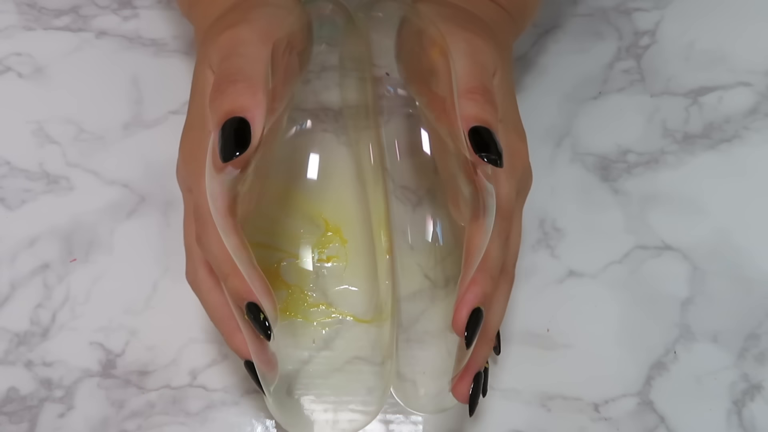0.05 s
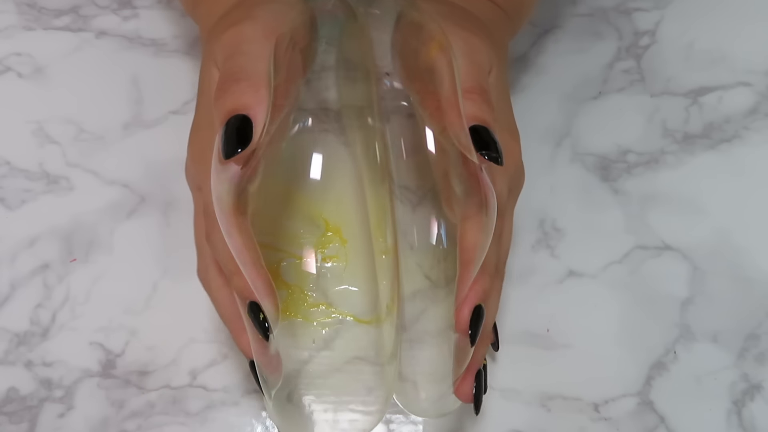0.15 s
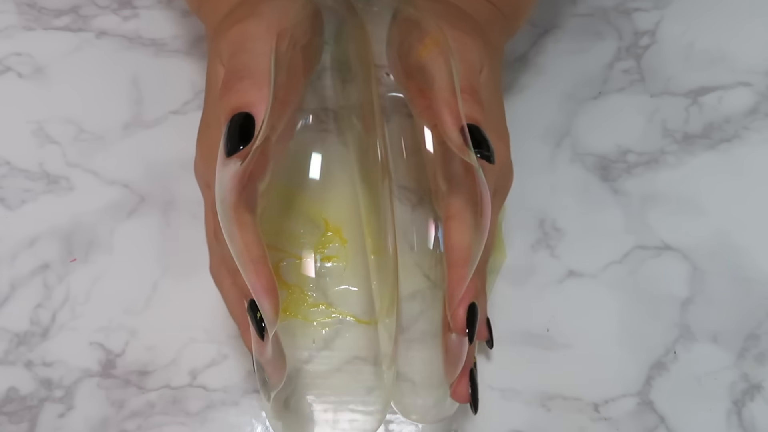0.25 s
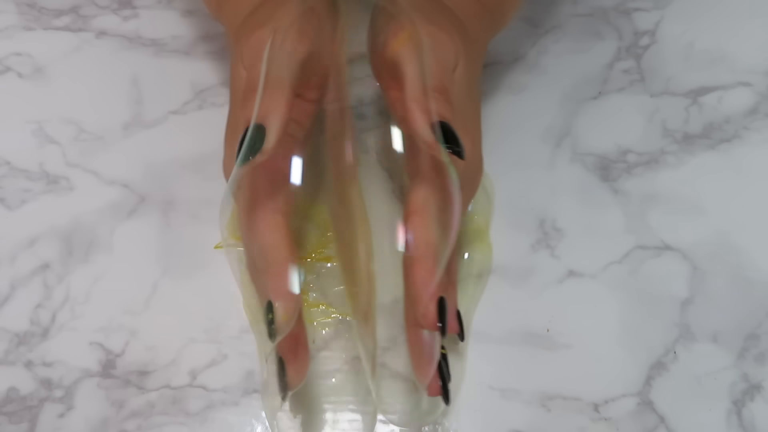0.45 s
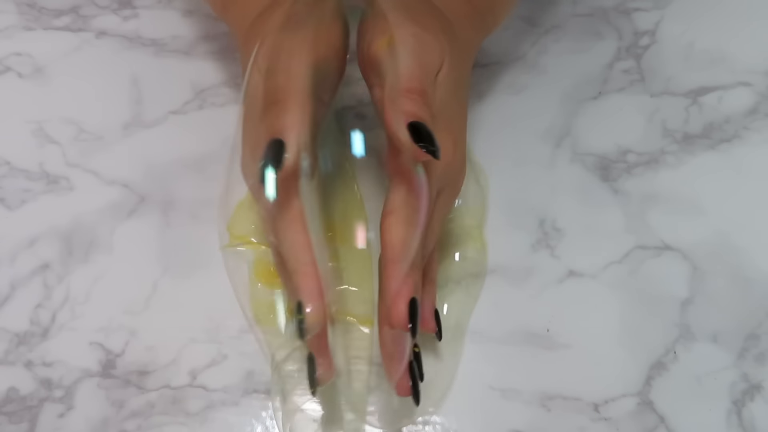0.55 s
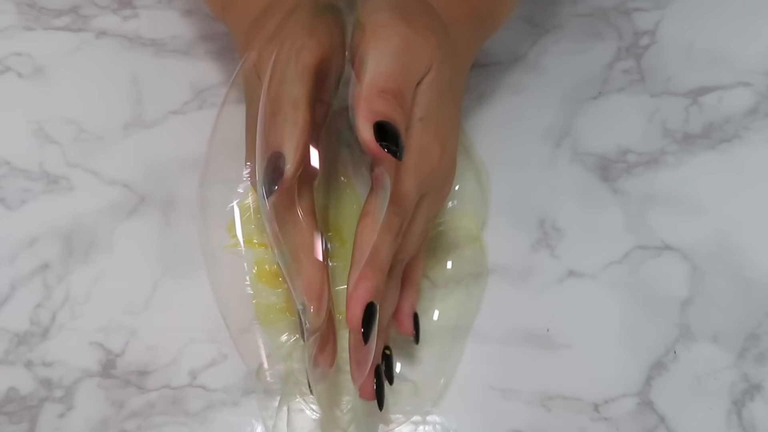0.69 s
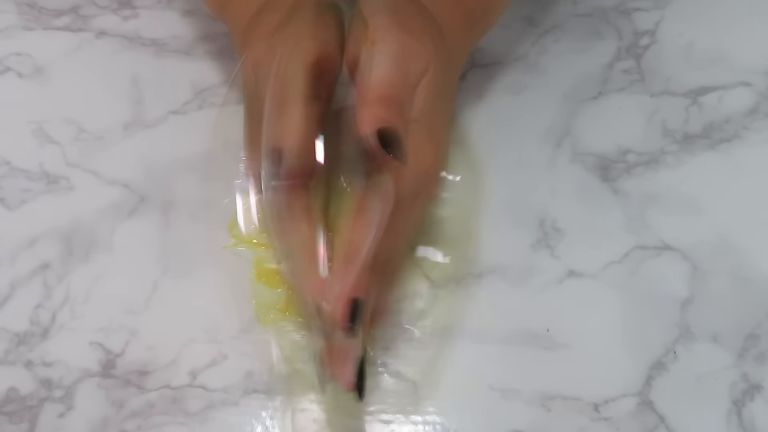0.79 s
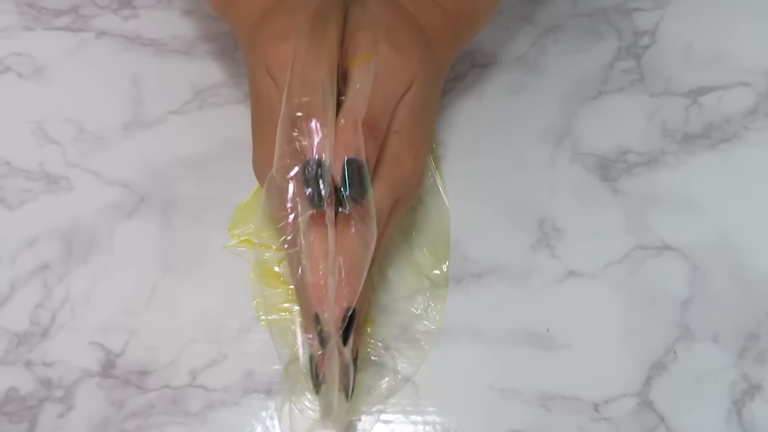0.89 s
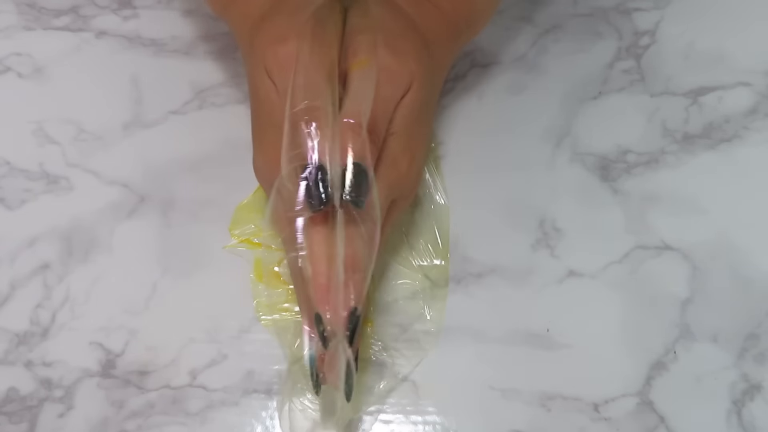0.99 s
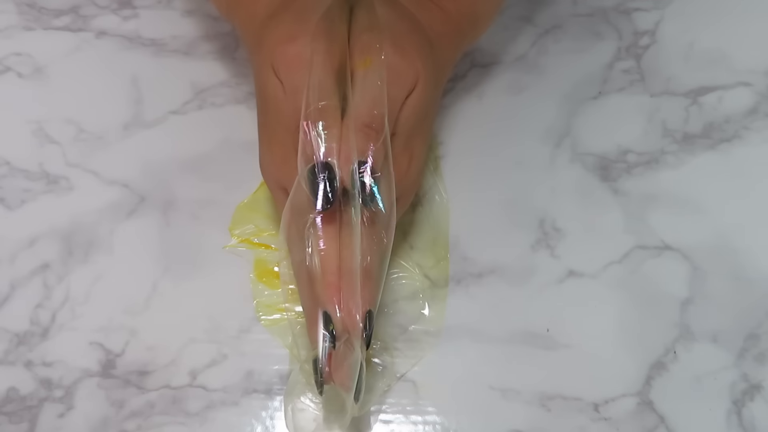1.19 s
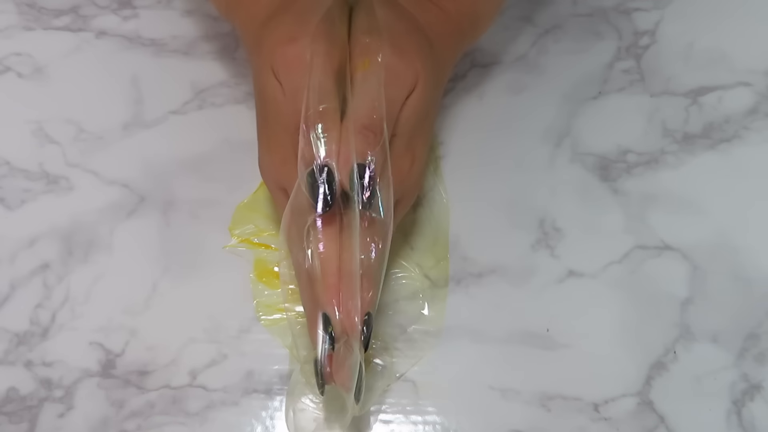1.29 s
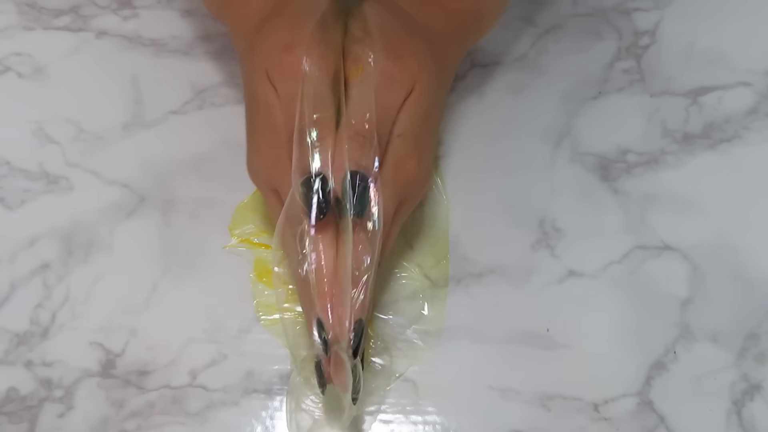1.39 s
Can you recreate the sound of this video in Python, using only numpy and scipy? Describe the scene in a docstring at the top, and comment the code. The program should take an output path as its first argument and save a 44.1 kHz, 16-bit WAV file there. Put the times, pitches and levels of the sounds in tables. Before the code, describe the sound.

A glue bubble pops loudly on a stone counter, close to the microphone. First the film creases and snaps under pressing hands and leaks squeaky, falling whistles; then the burst overloads the microphone and a small room rings briefly.

```python
"""Crackles and snaps, falling squeaks, then a loud pop with one low boom.
A bubble of thin glue film is squeezed between two hands on a stone counter, close to the microphone.
The film creases and snaps, air whistles out of three widening pinholes, and the bubble tears and bursts.
The pop overloads the microphone and leaves a small room ringing; the wet film starts to peel off."""
import sys
import numpy as np
from scipy import signal
from scipy.fft import rfft, irfft
from scipy.io import wavfile

SR = 44100
rng = np.random.default_rng(int(sys.argv[2]) if len(sys.argv) > 2 else 0)


def waveform_to_disk(signal):
    """Save audio, clipped to [-1, 1], as 16-bit WAV at the path in sys.argv[1]."""
    frames = np.transpose(np.atleast_2d(signal))
    scaled = np.clip(frames, -1, 1) * 32767
    samples = np.round(scaled).astype(np.int16)
    wavfile.write(sys.argv[1], SR, samples)


N = 63945
POP_S, EDGE_HZ = 0.8499, 15900

# Spectra of the film cracking and ripping. Each row: frequency in Hz, relative level in dB.
CRACK_SPECTRUM = [(200, -9.5), (1500, 9.5), (3500, 4), (6500, -6.5), (10000, -13.5), (16000, -20.5)]
RIP_SPECTRUM = [(200, -24), (1200, 2.5), (2500, -9), (4300, 4), (7000, -6.5), (10000, -16), (16000, -18.5)]


def amp(db):
    """Decibels to gain."""
    return 10 ** (np.asarray(db) / 20)


def unit_rms(x):
    """Scales to unit rms."""
    return x / np.sqrt(np.mean(x ** 2) + 1e-20)


def lookup(points, hz):
    """Interpolates a table along log frequency."""
    f, value = np.transpose(points)
    return np.interp(np.log(hz + 1), np.log(f + 1), value)


def add(mix, start_s, sound):
    """Adds a sound into the mix."""
    part = mix[max(round(start_s * SR), 0):][:len(sound)]
    part += sound[:len(part)]


def coloured(x, spectrum):
    """Filters by a table of (Hz, dB)."""
    return irfft(rfft(x) * amp(lookup(spectrum, np.fft.rfftfreq(x.shape[-1], 1 / SR))), x.shape[-1])


def delayed(x, delay_s):
    """Fractional-sample delay."""
    return irfft(rfft(x) * np.exp(-2j * np.pi * np.fft.rfftfreq(N, 1 / SR) * delay_s), N)


def noise_pair():
    """White noise at two close microphones: alike in the bass, apart in the treble."""
    # Each row: frequency in Hz, left-right correlation.
    coherence = [(1000, 0.98), (3000, 0.95), (6000, 0.4), (10000, 0.075), (16000, .1)]
    a, b = rfft(rng.standard_normal((2, N)))
    same = np.clip(lookup(coherence, np.fft.rfftfreq(N, 1 / SR)), 0, 1)
    mid, side = a * np.sqrt((1 + same) / 2), b * np.sqrt((1 - same) / 2)
    return irfft([mid + side, mid - side], N)


def stereo_noise(spectrum):
    """Coloured noise pair, unit rms."""
    return unit_rms(coloured(noise_pair(), spectrum))


def wander(rate_hz):
    """Low-passed random curve, unit rms."""
    rolloff = 1 + (np.fft.rfftfreq(N, 1 / SR) / rate_hz) ** 2
    return unit_rms(irfft(rfft(rng.standard_normal(N)) / rolloff, N))


def resonate(x, hz, width_hz):
    """Steep resonance following a frequency curve."""
    carrier = np.exp(2j * np.pi * np.cumsum(hz) / SR)
    r = np.exp(-np.pi * width_hz / SR)
    return (carrier * signal.lfilter([(1 - r) ** 2], [1, -2 * r, r * r], x / carrier + 1e-18)).real


def swing(hz, db, decay_s, size=4096):
    """Damped sine."""
    t = np.arange(size) / SR
    return amp(db) * np.sin(2 * np.pi * hz * t) * np.exp(-t / decay_s)


def crack(spectrum, db, decay_s, size=4096):
    """Tearing noise burst with a Gaussian decay."""
    fall = np.exp(-(np.arange(size) / SR / decay_s) ** 2)
    burst = coloured(rng.standard_normal(size), spectrum) * fall
    return amp(db) * burst * np.linalg.norm(fall) / np.linalg.norm(burst)


def pulse(spectrum, size=4096):
    """Minimum-phase click of a given spectrum."""
    log_gain = np.log(amp(lookup(spectrum, abs(np.fft.fftfreq(size, 1 / SR)))))
    return np.fft.ifft(np.exp(np.conj(signal.hilbert(log_gain)))).real


def rustle(creases_per_s=4000, spread_db=1.5, fizz_db=-3.5):
    """Dense tiny creases ring the air in the bubble until it pops."""
    # Each row: time in seconds, relative level in dB, bubble resonance in Hz.
    creasing = [(0, -27, 1241), (0.056, -41, 1360), (.09, -43, 1276), (.15, -47.5, 1213), (.2, -27, 1280),
                (0.256, -30, 1230), (.32, -47.5, 1122), (0.401, -37.5, 902), (.45, -23.5, 550),
                (.51, -26, 674), (0.571, -31.5, 740), (.62, -24.5, 687), (0.701, -55, 835),
                (.8, -71.5, 794)]
    t = np.arange(N) / SR
    times_s, db, hz = np.transpose(creasing)
    clicks = rng.standard_normal(N) * amp(spread_db * np.minimum(rng.exponential(1, N), 4))
    clicks *= rng.random(N) < creases_per_s / SR
    ring = unit_rms(resonate(clicks, np.interp(t, times_s, hz), width_hz=1210))
    fizz = amp(fizz_db) * unit_rms(coloured(clicks, CRACK_SPECTRUM))
    return (ring + fizz) * amp(np.interp(t, times_s, db) - 6) * (t < POP_S)


def palm_rub():
    """The palms rub softly on the bubble."""
    # Each row: time in seconds, level in dB.
    levels = [(0, -50), (.15, -49.5), (.22, -45), (.4, -50), (.8, -53.5), (.9, -76.5)]
    # Each row: frequency in Hz, relative level in dB.
    spectrum = [(20, -15), (60, -10), (140, 3), (200, 0), (320, -12), (8000, -73)]
    return amp(np.interp(np.arange(N) / SR, *np.transpose(levels))) * stereo_noise(spectrum)


def noise_floor(level_db=-56.5):
    """Faint steady rumble."""
    # Each row: frequency in Hz, relative level in dB.
    spectrum = [(25, -12.5), (60, -4), (170, 0.5), (260, -12.5), (1000, -18.5), (3000, -27.5), (8000, -34),
                (16000, -41)]
    return amp(level_db) * stereo_noise(spectrum)


def snaps(thump_lag_s=0.0007, low_cut_hz=231):
    """The film cracks and slaps, the trapped air thumps; returns direct sound and room feed."""
    # Each row: start in seconds, thump in dB and Hz, slap in dB and Hz, slap decay in seconds,
    # crack in dB, crack frequency ratio, room send in dB.
    events = [(0.0637, -37.5, 474, -12.5, 1210, 0.00091, -24.5, 1.82, -2),
              (0.0928, -34, 435, -40, 1430, .0004, -27.5, 1.3, 4.5),
              (.162, -13, 403, -7.5, 2780, 0.00039, -19.5, 1.2, 0.5),
              (0.1775, -30, 456, -16.5, 1480, 0.0003, -23.5, 0.78, 2.5),
              (0.1991, -30, 470, -6.5, 1140, 0.0009, -22.5, 1.27, -4.5),
              (.2114, -23.5, 370, 1, 2220, 0.00035, -13.5, 1.2, -3),
              (.308, -41.5, 398, -34, 2180, .0004, -29.5, 1.9, 1),
              (0.3598, -25.5, 381.6, -24.5, 2630, 0.00054, -22, 1.4, 4.5),
              (0.4199, 0.5, 300, 3, 2614, .00035, -7.5, 0.99, -5),
              (0.4887, -2, 250, -4.5, 1465, 0.00044, -16.5, 0.74, -11),
              (.578, -7, 338.4, -7.5, 1093, 0.00043, -11, 1.1, -2),
              (.8058, -5, 431, -0.5, 2280, 0.00026, -20.5, 1.4, -8)]
    direct, feed = np.zeros((2, N))
    for start_s, thump_db, thump_hz, slap_db, slap_hz, slap_s, crack_db, ratio, send_db in events:
        spectrum = [(hz * ratio, db) for hz, db in CRACK_SPECTRUM]
        thump = swing(thump_hz, thump_db, decay_s=0.0014)
        slap = swing(slap_hz, slap_db, slap_s)
        tick = crack(spectrum, crack_db, decay_s=0.00188)
        click = pulse(spectrum)
        click *= np.linalg.norm(tick) / np.linalg.norm(click)
        add(direct, start_s, slap + tick)
        add(direct, start_s + thump_lag_s, thump)
        add(feed, start_s, (slap + click) * amp(send_db))
        add(feed, start_s + thump_lag_s, thump * amp(send_db))
    # Small snaps move too little air for deep bass.
    return signal.lfilter(*signal.butter(2, low_cut_hz, "high", fs=SR), [direct, feed])


def whistle(curve, waver_hz=57, flutter_db=0.5, flicker_db=4, full_rasp_hz=3500):
    """Air sings through a widening pinhole, falling and fraying; returns tone and hiss."""
    # Gain of harmonics 1 to 3.
    harmonics_db = [2, -13.5, -22.5]
    # Each row: time in seconds, extra overtone gain in dB.
    shrillness = [(.32, 7.5), (.345, -9), (.36, 4.5), (.392, -5.5), (.413, 4.5), (.435, -7.5), (.5, -1.5),
                  (.592, -0.5), (.61, 10)]
    t = np.arange(N) / SR
    times_s, hz, db = np.transpose(curve)
    pitch_hz = np.interp(t, times_s, hz)
    shrill_db = np.interp(t, *np.transpose(shrillness))
    phase = 2 * np.pi * np.cumsum(pitch_hz + waver_hz * wander(292)) / SR
    choke_db = 5 * np.maximum(wander(90) - 0.5, 0)  # wet glue briefly chokes the hole
    gate = np.clip(np.minimum(t - times_s[0], times_s[-1] - t) / 0.0015, 0, 1)
    level = amp(np.interp(t, times_s, db) + flutter_db * wander(250) - choke_db) * gate
    tone = np.zeros(N)
    for k, harmonic_db in enumerate(harmonics_db, 1):
        extra_db = (k > 1) * (shrill_db + flicker_db * wander(90))
        tone += amp(harmonic_db + extra_db) * np.sin(k * phase) * (k * pitch_hz < EDGE_HZ)
    rasp = 1 + 0.4 * np.minimum(full_rasp_hz / pitch_hz, 1) ** 2 * wander(700)
    return level * rasp * tone, air_hiss(level, end_s=times_s[-1])


def air_hiss(level, end_s, lag_s=0.049, gain_db=-16.5, sputter_db=4.5):
    """Escaping air sputters, lagging the whistle's level."""
    # Each row: frequency in Hz, relative level in dB.
    spectrum = [(1000, -11), (3000, -4), (5500, 1.5), (9000, -9.5), (15000, -10)]
    r = np.exp(-1 / (lag_s * SR))
    fade = np.clip((end_s - np.arange(N) / SR) / 0.01, 0, 1)
    flow = signal.lfilter([1 - r], [1, -r], level) * fade
    return flow * amp(gain_db + sputter_db * wander(250)) * stereo_noise(spectrum)


def pinholes():
    """Three overlapping leaks; returns summed tone and hiss."""
    # Each row: time in seconds, pitch in Hz, relative level in dB.
    first = [(.308, 8060, -47), (.319, 7260, -28), (.333, 7020, -28.5), (.343, 6600, -7.5),
             (.352, 6176, -25.5), (.37, 5550, -21.5), (.384, 5596, -28), (0.393, 5430, -13),
             (0.403, 5050, -21), (0.416, 4830, -20), (0.431, 4330, -27), (0.446, 4800, -19.5),
             (.466, 4400, -20), (.472, 4150, -16.5), (.501, 4130, -18), (0.512, 3892, -27.5),
             (.522, 3967, -21.5), (.529, 3550, -32.5), (.541, 3300, -24), (.578, 3247, -18.5),
             (.583, 2909, -30.5), (.594, 2884, -20.5), (.606, 2441, -30.5), (0.618, 2356, -34.5)]
    second = [(.345, 11200, -34), (.36, 10250, -24.5), (.368, 9440, -26), (.39, 8380, -28.5),
              (.405, 8140, -32.5), (.442, 7050, -24.5), (.468, 6300, -22), (.49, 5770, -32),
              (.51, 5650, -28), (.523, 5090, -39)]
    third = [(.521, 6050, -35.5), (.527, 5880, -19), (.534, 5650, -30.5), (.541, 5520, -24),
             (.558, 4900, -25.5), (.573, 4870, -17.5), (.579, 4450, -29), (0.588, 4293, -24),
             (.6, 3980, -23), (0.611, 3100, -20.5), (.621, 2497, -34)]
    tones, hisses = zip(whistle(first), whistle(second), whistle(third))
    return sum(tones), sum(hisses)


def tear(start_s=0.808, hum_hz=540, waver_hz=91, hum_db=-31, hiss_db=-22, swell_s=0.004):
    """The opening tear hums, then hisses into the pop."""
    t = np.arange(N) / SR
    gate = np.clip(np.minimum(t - start_s, POP_S - t) / 0.00037, 0, 1)
    swell = np.exp(-abs(t - POP_S) / swell_s)
    hiss = swell * unit_rms(coloured(rng.standard_normal(N), RIP_SPECTRUM))
    hum = np.sin(2 * np.pi * np.cumsum(hum_hz + waver_hz * wander(180)) / SR)
    return gate * (amp(hum_db) * hum + amp(hiss_db) * hiss)


def pop(low_cut_hz=100):
    """The film rips and the air leaves in one blast; returns direct sound and room feed."""
    # Each row: delay in seconds, frequency in Hz, level in dB, decay in seconds.
    blast_swings = [(0, 2446, 7, 0.00044), (.0002, 918, 10, 0.00084), (.0014, 299.4, 7, 0.0025)]
    # Each row: frequency in Hz, level sent to the room in dB.
    feed_spectrum = [(50, 6), (120, 17), (250, 19), (500, 21), (1000, 20.5), (2000, 23), (4000, 14),
                     (8000, 1.5), (11000, -7.5), (13500, -26.5)]
    direct, feed = np.zeros((2, N))
    add(direct, POP_S, crack(RIP_SPECTRUM, db=4.5, decay_s=0.0012))
    for delay_s, hz, db, decay_s in blast_swings:
        add(direct, POP_S + delay_s, swing(hz, db, decay_s))
    add(feed, POP_S, pulse(feed_spectrum))
    return signal.lfilter(*signal.butter(1, low_cut_hz, "high", fs=SR), direct), feed


def boom(mode_hz=122, mode_db=-28, rise_s=0.074, t60_s=1.37, beat_hz=24):
    """One low room mode swells after the pop and dies slowly; higher modes beat in clusters."""
    # Each row: centre in Hz, level in dB, T60 in seconds.
    clusters = [(190, -27, .72), (245, -27, .6), (330, -25, .32), (405, -20.5, .42), (466, -20.5, .4)]
    t = np.maximum(np.arange(N) / SR - POP_S, 0)
    envelope = (1 - np.exp(-t / rise_s)) * amp(mode_db - 60 * t / t60_s)
    modes = envelope * np.sin(2 * np.pi * mode_hz * t)
    for hz, db, cluster_t60_s in clusters:
        beats = (wander(beat_hz) + 1j * wander(beat_hz)) / np.sqrt(2)
        envelope = (1 - np.exp(-t / 0.0056)) * amp(db - 60 * t / cluster_t60_s)
        modes += envelope * (beats * np.exp(2j * np.pi * hz * t)).real
    return modes


def peel():
    """The wet film starts to peel from the hands: a faint rising hiss."""
    # Each row: time in seconds, level in dB.
    levels = [(1.33, -78), (1.41, -67), (1.45, -54)]
    level_db = np.interp(np.arange(N) / SR, *np.transpose(levels), left=-120)
    return amp(level_db) * stereo_noise(CRACK_SPECTRUM)


def echo(x, cutoff_hz=2700):
    """One dull reflection off a nearby surface."""
    # Each row: delay in seconds, gain in dB.
    reflections = [(.0066, -17)]
    dull = signal.lfilter(*signal.butter(1, cutoff_hz, fs=SR), x)
    reflected = np.zeros(N)
    for delay_s, db in reflections:
        add(reflected, delay_s, amp(db) * dull)
    return reflected


def room(x, rise_s=0.003):
    """Diffuse stereo tail of a small room, longest in the midrange."""
    # Each row: frequency in Hz, T60 in seconds.
    decay_times = [(100, 0.097), (300, 0.35), (700, 0.53), (1800, 0.41), (5000, 0.43), (12000, 0.47)]
    # Each row: frequency in Hz, gain in dB.
    spectrum = [(60, -23), (200, -2.5), (500, 4), (1300, 1), (3000, -5.5), (6000, 0.5), (10000, 0.5),
                (16000, 6)]
    hz, t, bins = signal.stft(noise_pair(), SR, nperseg=256)
    decay = amp(-60 * t / lookup(decay_times, hz)[:, None])
    tail = signal.istft(bins * decay, SR, nperseg=256)[1][:, :N]
    onset = 1 - np.exp(-(np.arange(N) / SR / rise_s) ** 2)
    tail = coloured(tail / np.linalg.norm(tail[0]), spectrum) * onset
    return signal.fftconvolve(x[None], tail[:, :N // 2 + N // 4], axes=1)[:, :N]


def scene():
    """Bubble, hands and room at two close microphones."""
    snap, snap_feed = snaps()
    burst, burst_feed = pop()
    tone, hiss = pinholes()
    film = rustle() + tear()
    near = snap + film + burst
    near += echo(near + tone)
    left = near + tone
    right = delayed(near, delay_s=6e-6) + delayed(tone, delay_s=16e-6)
    reverb = room(snap_feed + burst_feed + amp(-5.5) * (tone + hiss[0]) + amp(-0.5) * film)
    return np.array([left, right]) + hiss + reverb + boom() + palm_rub() + peel() + noise_floor()


def record(dry):
    """The recorder clips at full scale and cuts the top treble."""
    lowpass = signal.firwin(511, EDGE_HZ, window=("kaiser", 9), fs=SR)
    return signal.oaconvolve(np.clip(dry, -1, 1), lowpass[None], "same")


dry = scene()
out = record(dry)
waveform_to_disk(out)
```